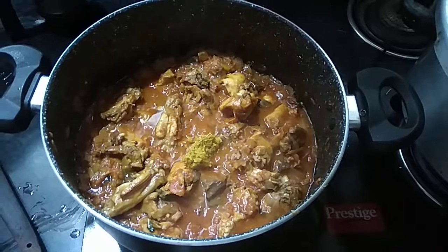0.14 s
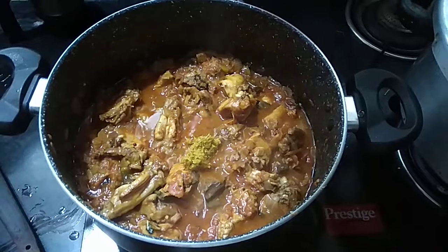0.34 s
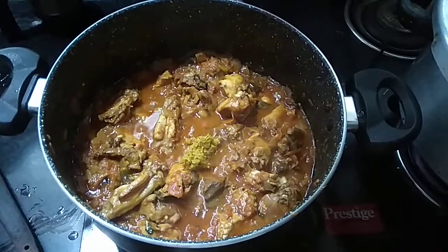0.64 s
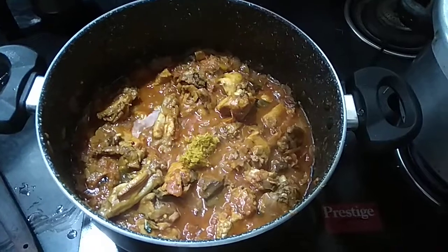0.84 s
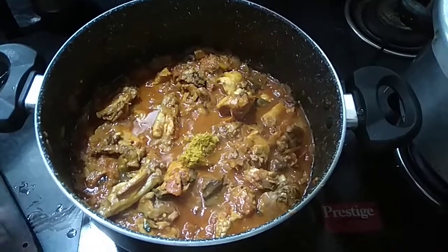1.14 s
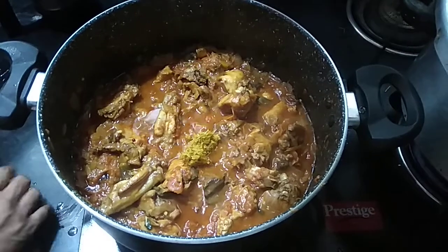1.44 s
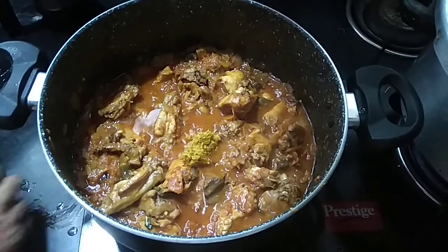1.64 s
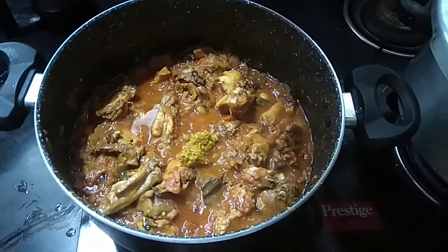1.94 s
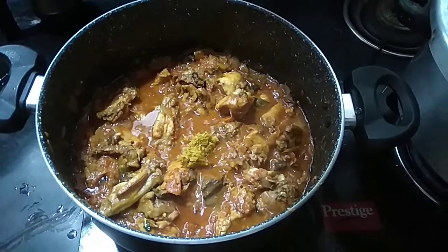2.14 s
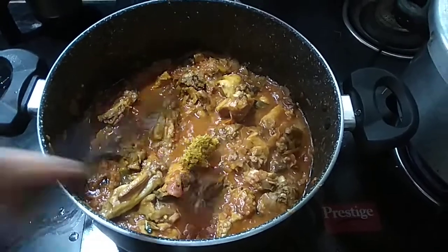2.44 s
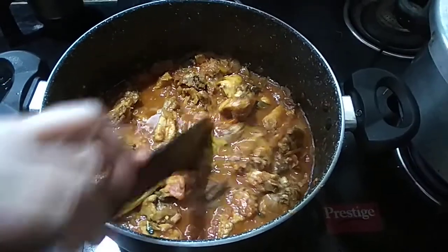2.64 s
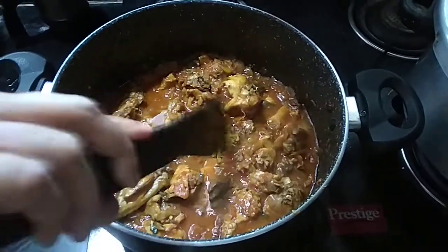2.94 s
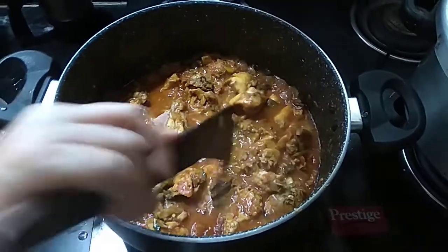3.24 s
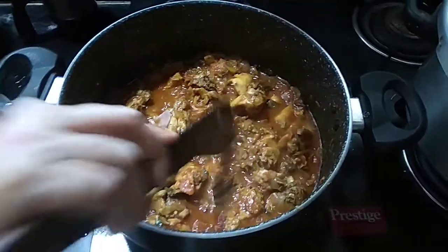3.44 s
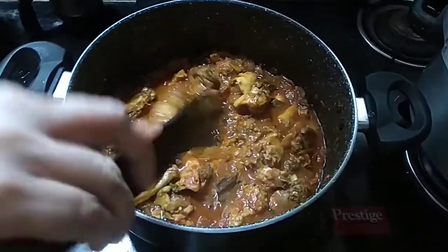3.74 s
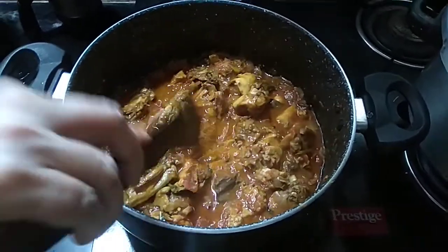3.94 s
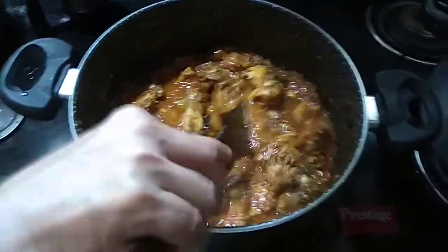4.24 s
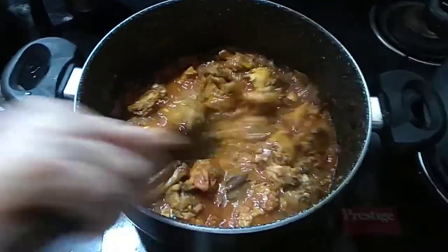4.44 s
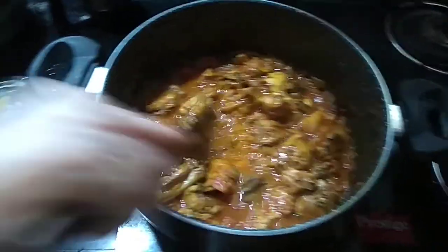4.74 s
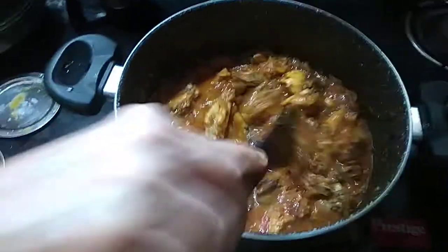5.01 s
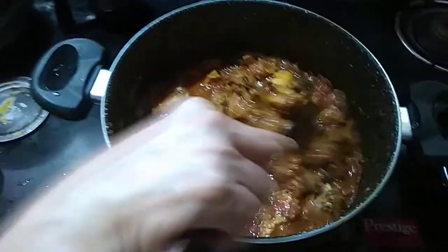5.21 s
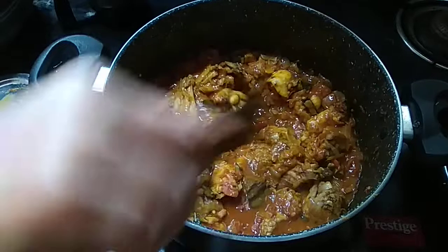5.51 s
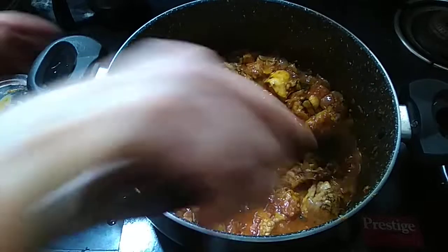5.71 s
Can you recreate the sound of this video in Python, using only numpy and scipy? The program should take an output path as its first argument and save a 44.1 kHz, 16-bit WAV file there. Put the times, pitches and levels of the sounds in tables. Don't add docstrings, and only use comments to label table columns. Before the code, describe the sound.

A thick curry sizzles without pause for about six seconds, a fine bright crackle with sharp spits of fat, close up in a small hard-walled kitchen. A dull knock opens, a brief low scrape follows at 0.5 s and a single thin bangle clink at 0.7. A brighter knock comes at 1.0, a lighter one at 1.4, and a heavy dull thud at 1.8 leaves a short low hum. Stirring starts near 2.7 with faint wet rubbing; bangles touch at 2.9, just before the heaviest knock at 3.0, and clink again at 3.3. A sharp spit pops at 3.6. From 4.2 to 4.65 the bangles jingle in a dense silvery cluster, ending with a firm knock. Damped clinks follow at 4.9, then ticks, squelches and a weaker knock around 5.2, and a hollow spatula scrape from 5.6 to 5.8. Low handling bumps shake the handheld stereo microphone, mainly left, strongest around 5.0.

```python
import sys
import numpy as np
from scipy import signal
from scipy.fft import rfft, irfft
from scipy.io import wavfile
from scipy.ndimage import uniform_filter1d, minimum_filter1d

SR = 44100
rng = np.random.default_rng(int(sys.argv[2]) if len(sys.argv) > 2 else 0)


def persist_wave(psi):
    counts = np.round(np.clip(psi, -1, 1) * 32767).astype(np.int16)
    wavfile.write(sys.argv[1], SR, np.atleast_2d(counts).T)


def linear_from_db(decibels):
    return 10 ** (np.asarray(decibels, float) / 20)


N = 258867


def in_time(rows):
    s, *columns = np.transpose(rows)
    return [np.interp(np.arange(N) / SR, s, c) for c in columns]


def rms_one(x):
    return x / np.sqrt(np.mean(x ** 2) + 1e-20)


def coloured(x, points):
    log_hz = np.log(np.fft.rfftfreq(x.shape[-1], 1 / SR) + 1)
    point_hz, point_db = np.transpose(points)
    return irfft(rfft(x) * linear_from_db(np.interp(log_hz, np.log(point_hz), point_db)), x.shape[-1])


def drift(rate_hz):
    knots = rng.standard_normal(int(N / SR * 60) + 3)
    return np.interp(np.arange(N) / SR * rate_hz, np.arange(len(knots)), knots)


def grains(per_s, spread_db):
    happens = rng.random(N) < per_s / SR
    height = linear_from_db(spread_db * np.minimum(rng.exponential(1, N), 5))
    return happens * height * rng.choice([-1, 1], N)


def ring(clicks, hz, t60):
    r, w = linear_from_db(-60 / (t60 * SR)), 2 * np.pi * hz / SR
    return signal.lfilter([0, np.sin(w)], [1, -2 * r * np.cos(w), r * r], clicks + 1e-18)


def resonance(x, hz, width_hz):
    r = np.exp(-np.pi * width_hz / SR)
    poles = [1, -2 * r * np.cos(2 * np.pi * hz / SR), r * r]
    return signal.lfilter((1 - r * r) / 2 * np.array([1, 0, -1]), poles, x)


def struck(hz, width_hz, contact_s):
    t = np.arange(4000) / SR
    rattle = rng.standard_normal(len(t)) * np.exp(-t / contact_s) * (1 - np.exp(-t / 0.00033))
    x = rattle + 9.55 * (t == 0)
    x = resonance(resonance(resonance(x, hz, width_hz), hz, 1.06 * width_hz), hz, 2 * width_hz)
    return x / np.abs(x).max()


def swells(rows, rise_db_s, fall_db_s):
    t, gains = np.arange(N) / SR, 0
    for s, hold, *db in rows:
        lost_db = rise_db_s * np.maximum(s - t, 0) + fall_db_s * np.maximum(t - s - hold, 0)
        gains = gains + linear_from_db(np.array(db)[:, None] - lost_db)
    return gains


def pan(x, db):
    return np.array([x * linear_from_db(db / 2), x * linear_from_db(-db / 2)])


def add(out, s, piece):
    i = max(round(s * SR), 0)
    out[:, i:i + piece.shape[1]] += piece[:, :N - i]


def room(x, wet_db, alike):
    # pitch_hz, t60_s
    room_t60 = [(200, 0.24), (600, 0.29), (2000, 0.4), (6000, 0.33), (12000, 0.029)]
    t60_hz, t60_s = np.transpose(room_t60)
    t = np.arange(int(.6 * SR)) / SR
    mid, side = 0, 0
    for hz in 62.5 * 2 ** np.arange(8):
        t60 = np.interp(np.log(hz), np.log(t60_hz), t60_s)
        top_hz = hz * np.sqrt(2) if hz < 7000 else 19000
        sos = signal.butter(2, [hz / np.sqrt(2), top_hz], "band", fs=SR, output="sos")
        fade = linear_from_db(-60 * t / t60) * (1 - np.exp(-t / 0.0034))
        band = signal.sosfilt(sos, rng.standard_normal((2, len(t)))) * fade
        mid = mid + band[0] * (1 if hz < 700 else 0.6)
        side = side + band[1] * (1 if hz < 700 else 1.5)
    tail = np.array([np.sqrt(1 + alike) * mid + sign * np.sqrt(1 - alike) * side for sign in (1, -1)])
    tail = tail / np.sqrt(np.sum(tail ** 2) / 2)
    return x + linear_from_db(wet_db) * signal.fftconvolve(x, tail, axes=1)[:, :N]


def air():
    # pitch_hz, level_db (per Hz)
    air_colour = [(13, -31.5), (22, 7.5), (97, -10.5), (149, -8), (495, -8), (701, -14.5), (1210, -6.5),
                  (1600, -16), (2480, -4), (3150, -25.5), (4000, -17), (5200, -32.5), (8800, -120)]
    noise = coloured(rng.standard_normal((2, N)), air_colour + [(9000, -64.0)])
    return linear_from_db(-75.5) * rms_one(noise)


def sizzle():
    # time_s, level_db, left_right_db
    frying = [(0.0, -51, 1.5), (0.62, -48.5, 2), (0.85, -52, 0.5), (1.27, -50, 3), (1.52, -51.5, 1.5),
              (1.93, -51, 1), (2.78, -52, 3), (3.86, -51.5, 1.5), (4.33, -50.5, 3.5), (4.56, -50.5, -7.5),
              (4.67, -49, 1.5), (4.87, -53.5, 6), (5.28, -51, 3), (5.48, -52, 1), (5.71, -52, 4),
              (5.87, -48.5, 4.5)]
    # pitch_hz, level_db (per Hz)
    frying_colour = [(1470, -46.5), (2500, -11), (3110, -7.5), (3640, -7), (5030, 2), (6260, 4), (7040, 3),
                     (9490, 8.5), (15600, 3), (16000, -41.5), (16300, -57)]
    level_db, pan_db = in_time(frying)
    bursts_per_s = 3500 * linear_from_db(2.5 * drift(55))
    voices = []
    for _ in range(2):
        clicks, dealt = grains(bursts_per_s, 3.42), rng.integers(0, 10, N)
        pips = 0
        for k, hz in enumerate(np.geomspace(3500, 15500, 10)):
            pips = pips + ring(clicks * (dealt == k), hz, 15.0 / hz) * hz ** 0.69
        voices.append(rms_one(pips) + 0.6 * rng.standard_normal(N))
    both = np.array(voices) + 0.022 * np.array(voices[::-1])
    return rms_one(coloured(both, frying_colour)) * pan(linear_from_db(level_db + 1.5 + drift(26)), pan_db)


def rumble():
    # start_s, hold_s, level_db
    jolts = [(0.001, 0.0073, -69.5), (0.52, 0.008, -90), (1.06, 0.027, -90), (1.45, 0.0082, -77),
             (1.67, 0.01, -103), (1.87, 0.083, -70), (2.03, 0.014, -72), (2.65, 0.006, -79.5),
             (2.86, 0.01, -85.5), (3.08, 0.085, -69), (3.3, 0.28, -90), (3.6, 0.0066, -89.5),
             (4.29, 0.0051, -72), (4.66, 0.091, -67), (5.04, 0.068, -56), (5.2, 0.12, -62),
             (5.74, 0.028, -76), (5.85, 0.022, -67)]
    still_grip_db = -94.5
    shake = rng.standard_normal((2, N))
    level = swells(jolts, rise_db_s=344.5, fall_db_s=242)[0] + linear_from_db(still_grip_db)
    thud = rms_one(resonance(resonance(shake[0], 84, 23), 95.0, 86))
    sway = rms_one(resonance(resonance(shake[1], 44, 130), 32, 74))
    return pan(level * thud, 17) + pan(0.17 * level * sway, 46.0)


def knocks():
    # start_s, peak_db, body_hz, body_width_share (of body_hz), hardness_db
    blows = [
        (0.003, -38.5, 390, 1, -15.5),
        (1.043, -29.5, 890, 0.43, -13),
        (1.42, -33.5, 596, 0.27, -13),
        (1.642, -53, 504, 0.17, 5.5),
        (1.842, -27, 479, 0.49, -38.5),
        (3.034, -21, 521, 0.43, -33),
        (4.645, -27, 502, 0.58, -20),
        (5.237, -36, 547, 0.48, -26.5),
    ]
    # start_s, peak_db, pitch_hz, width_hz
    overtones = [(0.002, -37.5, 1180, 610), (0.002, -52.5, 257, 108), (1.030, -46, 760, 294),
                 (1.039, -35.5, 3750, 2380), (1.044, -51, 477, 206), (1.422, -44, 4950, 300),
                 (1.417, -42.5, 6900, 600), (1.416, -36, 9600, 900), (1.041, -24, 12600, 4060),
                 (1.426, -48, 2000, 280), (1.846, -35.5, 290, 130), (1.842, -33, 550, 220),
                 (1.845, -45, 216, 90), (1.848, -37.5, 1100, 694), (1.848, -36, 4300, 1510),
                 (1.849, -22, 8500, 8070), (1.849, -30, 2400, 1000), (3.04, -30, 1000, 450),
                 (3.034, -40, 288, 110.3), (3.041, -40.5, 1590, 880), (4.601, -56.5, 1710, 396),
                 (4.647, -38.5, 978, 200), (4.646, -36.5, 288, 152), (4.651, -43, 1250, 372),
                 (5.222, -47.5, 705, 385)]
    crack_over_ring_db = 21.5
    out = np.zeros((2, N))
    for s, db, hz, width_share, ring_db in blows:
        body = struck(hz, width_share * hz, 0.0086)
        bright_ring = linear_from_db(ring_db) * struck(2420, 1409, 0.0065)
        crack = linear_from_db(ring_db + crack_over_ring_db) * struck(5400, 11000, 0.0056)
        add(out, s, pan(linear_from_db(db - 5.5) * (body + bright_ring + crack), 8.2))
    for s, db, hz, width_hz in overtones:
        add(out, s, pan(linear_from_db(db) * struck(hz, width_hz, 0.0074), 5.7))
    return out


def ticks():
    # start_s, peak_db, pitch_hz, width_hz
    specks = [(0.0473, -32, 9200, 6030), (0.616, -33, 8000, 6000), (1.2316, -45, 9100, 6000),
              (1.2595, -38, 9100, 6000), (1.7464, -55, 9000, 6000), (2.2992, -51, 9000, 6000),
              (2.396, -30, 9050, 5960), (3.1694, -37, 9000, 9000), (3.8227, -32, 9000, 6000),
              (4.0741, -36.5, 9450, 6050), (4.3176, -36.5, 12200, 6000), (4.369, -36, 12700, 4000),
              (4.8903, -37, 3970, 5070), (5.0619, -36, 9000, 6000), (5.145, -35, 9000, 6000),
              (5.1934, -34, 9000, 6000), (5.1308, -56, 5600, 2500), (5.1462, -33, 5070, 2500),
              (5.175, -58, 4000, 1500), (5.2011, -28.5, 3520, 2500), (5.2201, -37, 4270, 2500),
              (5.228, -34, 4800, 3000), (5.515, -40, 6080, 2420), (5.7917, -43, 9000, 6000),
              (4.3875, -30, 10500, 6000), (4.7175, -34, 10500, 6000)]
    out = np.zeros((2, N))
    for s, db, hz, width_hz in specks:
        add(out, s, pan(linear_from_db(db) * struck(hz, width_hz, 0.0012), 3.0))
    return out


def touches():
    # start_s, peak_db, pitch_hz
    plops = [(0.168, -59.5, 355), (0.207, -63, 1250), (1.678, -81, 503), (1.828, -58, 497),
             (2.149, -61, 475), (2.207, -62, 1210), (2.349, -66, 636), (2.524, -65.5, 355),
             (2.588, -71, 1010), (2.629, -57, 538), (2.739, -62, 1910), (2.778, -60, 1980),
             (2.922, -54, 1647), (3.419, -57, 1456), (3.601, -68, 1890), (3.865, -61.5, 1963),
             (4.342, -57, 1152), (5.069, -57.5, 420), (5.197, -56.5, 1150), (5.223, -48, 282)]
    # start_s, peak_db, pitch_hz, width_hz
    squelches = [(0.251, -65.5, 1238, 117), (2.74, -71, 344, 120), (2.929, -62, 568, 195),
                 (3.421, -48.5, 2630, 1240), (3.649, -66.5, 1890, 122), (4.169, -71.5, 426, 300),
                 (4.241, -62, 1050, 496), (4.317, -63, 490, 200), (4.901, -44.5, 3360, 2530),
                 (5.074, -64, 1310, 152), (5.072, -60, 1690, 194), (5.2, -50, 2200, 706),
                 (5.793, -64, 2990, 616)]
    # start_s, peak_db, pitch_hz, width_hz
    catches = [(0.466, -57, 380, 129), (0.488, -44, 355, 88), (0.498, -52.5, 1186, 199),
               (0.529, -51, 450, 129), (0.591, -66, 1186, 150), (5.635, -48.5, 567, 127),
               (5.643, -52.5, 2000, 1090), (5.660, -60, 2000, 153), (5.711, -61, 1030, 198),
               (5.732, -70, 344, 90), (5.766, -46.5, 341, 60), (5.761, -48.5, 1170, 249),
               (5.805, -42, 590, 132), (5.806, -54, 2250, 150), (5.809, -47, 1250, 300)]
    plop_width_hz = 143
    out = np.zeros((2, N))
    for s, db, hz, width_hz in [(*row, plop_width_hz) for row in plops] + squelches + catches:
        add(out, s, pan(linear_from_db(db) * struck(hz, width_hz, 0.013), 14))
    return out


def spits():
    # start_s, peak_db, left_right_db
    fat_bursts = [(0.243, -32, -6), (0.4775, -40, 19), (1.1872, -45, 3), (1.492, -28, 4),
                  (1.6189, -32.5, 2), (1.729, -34, -8), (1.8127, -35.5, -7), (2.398, -30.5, 3),
                  (2.698, -34, -10), (3.167, -43, -12), (3.236, -56, 2), (3.5795, -23, 4.5),
                  (3.8233, -34.5, -4), (3.871, -36, 8.5), (3.9535, -29.5, 6.5), (4.3198, -54, -15),
                  (4.3884, -25.5, 8), (5.0619, -37, 22.5), (5.1178, -36, -16), (5.1476, -34, 14),
                  (5.1919, -33, 2), (5.396, -49, -18), (5.7073, -33, -2), (5.8426, -42, 23)]
    mean_hz, spread_oct, spray_share = 10800, 0.15, 1.6
    out, t = np.zeros((2, N)), np.arange(2000) / SR
    for s, db, pan_db in fat_bursts:
        hz = mean_hz * 2 ** (spread_oct * rng.uniform(-0.35, 1))
        pip = np.exp(-t / 0.0002)
        spray = (rng.random(len(t)) < 1500 / SR) * np.exp(-t / 0.028)
        burst = rng.standard_normal(len(t)) * (pip + spray_share * spray)
        burst = resonance(resonance(burst, hz, 2800), hz, 5400)
        add(out, s, pan(linear_from_db(db - 2.0) * burst / np.abs(burst).max(), np.clip(pan_db, -12, 14)))
    return out


def drags():
    # start_s, hold_s, low_modes_db, high_modes_db
    strokes = [
        [(0.476, 0.057, -57.5, -68), (0.505, 0.06, -71, -65)],
        [(5.64, 0.041, -49.5, -57.5), (5.73, 0.037, -57, -62.5), (5.775, 0.07, -47.5, -53.5)],
    ]
    # pitch_hz, width_hz, level_db
    floor_modes = [
        [(355, 92, 0), (1186, 75, -11.5), (1480, 100, -20.5), (2000, 34, -26), (2420, 500, -25),
         (2840, 160, -19.5)],
        [(344, 39, 9.5), (593, 71, 1.5), (971, 20, -1.5), (1170, 210, -10.5), (1670, 9.5, -11), (2000, 90, -31),
         (2250, 90, -20), (2944, 210, -21)],
    ]
    out, slips = 0, grains(2500, 2.5)
    for rows, modes in zip(strokes, floor_modes):
        levels = swells(rows, rise_db_s=2500, fall_db_s=400)
        for level, is_low in zip(levels, (True, False)):
            body = 0
            for hz, width_hz, db in modes:
                if (hz < 850) == is_low:
                    body = body + linear_from_db(db) * resonance(resonance(slips, hz, width_hz), hz, 1.5 * width_hz)
            out = out + level * rms_one(body)
    return pan(out, 5.4)


def clash(strikes, modes, ring_share):
    out, t = np.zeros((2, N)), np.arange(7500) / SR
    hz, level_db, t60 = np.transpose(modes)[:, :, None]
    next_touches = [row[0] for row in strikes[1:]] + [N / SR]
    for (s, db, top_hz, pan_db, attack_ms), later in zip(strikes, next_touches):
        strength_db = level_db + rng.normal(0, 4, hz.shape) - 8 * abs(np.log2(hz / top_hz))
        strength_db = strength_db + 4.5 * (abs(hz / top_hz - 1) < .02)
        flutter_db = 0.14 * signal.lfilter([1], [1, -.985], rng.standard_normal((len(modes), len(t))))
        decay = linear_from_db(strength_db + flutter_db - 60 * t / (ring_share * t60))
        rings = decay * np.sin(2 * np.pi * (hz * t + rng.random(hz.shape)))
        rubbing = resonance(resonance(rng.standard_normal(len(t)), 14000, 5000), 11500, 7000)
        rattle = rubbing * linear_from_db(-4 - 60 * t / (0.18 * ring_share))
        attack = (1 - np.exp(-1500 * t / attack_ms)) ** 2
        piece = (rings.sum(axis=0) + rattle) * attack * (0.45 + np.exp(-t / 0.015))
        damped = linear_from_db(-9 * np.clip((t - (later - s) + .010) / .012, 0, 1))
        add(out, s, pan(linear_from_db(db) * damped * piece / np.abs(piece).max(), np.clip(pan_db, -16, 16)))
    return out


def bangles():
    # start_s, peak_db, loudest_hz, left_right_db, attack_ms
    clinks = [
        (0.7367, -26, 12500, -1, 0.28),
        (2.9106, -30.5, 12050, 18.5, 0.41),
        (2.9225, -29, 11080, -12.5, 1.9),
        (3.3032, -29, 10760, -9, 0.84),
        (3.3185, -38.5, 11000, -14, 1.5),
    ]
    jingles = [(4.2243, -42.5, 10760, 8, 1.4), (4.252, -34.5, 12000, 9.5, 3.1), (4.358, -35, 11400, 0, 1.1),
               (4.4058, -21.5, 13500, 13, 4.2), (4.452, -21.5, 10300, 16, 5),
               (4.4615, -20.5, 10820, 13, 6.8), (4.476, -25, 10300, 13.5, 3),
               (4.508, -17.5, 10830, 14, 5.5), (4.546, -27, 13500, 10, 2.5),
               (4.5695, -15.5, 13500, 12, 0.8), (4.5905, -16.5, 12005, 11, 6), (4.631, -27, 12100, 10, 2.2),
               (4.646, -30, 12005, 8, 4)]
    damp_jingles = [
        (4.8891, -29, 11500, -4, 2.5),
        (4.9, -29.5, 14900, 8.5, 4),
        (4.921, -30, 10070, -10.5, 0.94),
        (4.9531, -30, 12100, 2, 0.8),
    ]
    # pitch_hz, level_db, t60_s
    thin_bangle = [(9900, -14, .08), (10560, -10, .08), (10985, -6, .1), (11080, 0, .11), (11200, -2, .1),
                   (11500, -9, .08), (11720, -6, .12), (11900, -9, .08), (12250, -6, .08),
                   (13100, -12, .06), (15570, -16, .08)]
    large_bangles = [(3950, -20, .25), (5250, -22, .1), (5950, -16, .3), (7200, -20, .1), (8222, -11, .25),
                     (8900, -14, .08), (9232, -12, .1), (9458, -11, .15), (9880, -8, .1), (10020, -11, .1),
                     (10180, -6, .2), (10320, -9, .15), (10453, -2, .25), (10809, -5, .15)]
    small_bangles = [(10844, -1, .2), (10930, -7, .1), (11140, -8, .1), (11390, -10, .1), (12005, -3, .2),
                     (12136, -7, .12), (12188, -8, .2), (12410, -11, .1), (13005, -10, .12),
                     (13310, -7, .12), (13424, -4, .1), (13600, -5, .15), (14000, -12, .1),
                     (14750, -7, .25)]
    bunch = large_bangles + small_bangles
    out = clash(clinks, thin_bangle, ring_share=0.55)
    out = out + clash(jingles, bunch, ring_share=0.91)
    return out + clash(damp_jingles, bunch, ring_share=0.52)


def slides():
    # start_s, peak_db, pitch_hz, width_hz, contact_s
    contacts = [(4.465, -58, 2330, 250, 0.04), (4.475, -58, 2800, 400, 0.03), (4.51, -60, 2350, 200, 0.03),
                (4.59, -44, 5250, 300, 0.006), (4.6, -58, 3050, 400, 0.04), (1.8425, -30, 480, 260, 0.004),
                (1.853, -28, 400, 300, 0.005), (3.052, -25, 620, 400, 0.003), (3.09, -40, 600, 400, 0.012),
                (3.17, -46, 800, 700, 0.03), (5.672, -46, 600, 150, 0.006), (5.826, -42, 480, 300, 0.01),
                (5.0095, -39, 8500, 4000, 0.0006), (5.038, -37, 9000, 4000, 0.0006),
                (5.082, -36, 9500, 4000, 0.001), (5.146, -35, 13500, 5000, 0.006),
                (5.119, -42, 11500, 2000, 0.012), (5.2, -38, 14000, 4000, 0.001),
                (1.045, -50, 2000, 250, 0.025), (1.042, -42, 4200, 600, 0.004),
                (1.046, -30, 6500, 6000, 0.0006), (4.65, -38, 1000, 300, 0.02),
                (1.95, -44, 300, 250, 0.015)]
    # start_s, peak_db, pitch_hz, width_hz, contact_s
    singing = [(4.405, -30, 13600, 300, 0.004), (4.405, -40, 8222, 100, 0.02),
               (4.455, -43, 5950, 60, 0.025), (4.468, -31, 13500, 200, 0.015),
               (4.478, -41, 8222, 80, 0.015), (4.592, -21, 12005, 250, 0.003),
               (4.595, -33, 14750, 80, 0.025), (4.644, -31, 12005, 90, 0.012),
               (4.655, -41, 13600, 80, 0.02), (2.923, -36, 15000, 1500, 0.002),
               (2.925, -31, 11080, 400, 0.003)]
    out = np.zeros((2, N))
    for s, db, hz, width_hz, contact_s in contacts + singing:
        add(out, s, pan(linear_from_db(db) * struck(hz, width_hz, contact_s), 6.0))
    return out


def bumps():
    # start_s, peak_db, width_hz
    pushes = [
        (1.866, -56, 11),
        (4.967, -49, 14),
        (5.0505, -33, 90),
    ]
    out, push = np.zeros((2, N)), signal.unit_impulse(SR // 2)
    for s, db, width_hz in pushes:
        shudder = resonance(resonance(resonance(push, 61, 100), 85, width_hz), 60, 53)
        add(out, s, pan(linear_from_db(db) * shudder / np.abs(shudder).max(), 12.0))
    return out


def hum():
    # start_s, hold_s, level_db
    worktop = [
        (1.885, 0.055, -48.5),
        (1.955, 0.02, -54),
        (2.025, 0.045, -56.5),
        (3.08, 0.08, -72),
    ]
    level = swells(worktop, rise_db_s=500, fall_db_s=700)[0]
    tone = np.sqrt(2) * np.sin(2 * np.pi * 85 * np.arange(N) / SR)
    return pan(level * tone, 12.0)


def stirring():
    # start_s, hold_s, murmur_db, rub_db
    strokes = [(2.72, 0.017, -70, -61.5), (2.93, 0.028, -76, -67.5), (3.62, 0.014, -65.5, -58),
               (3.87, 0.018, -79, -80), (4.12, 0.16, -69, -60.5), (4.42, 0.13, -71, -61.5),
               (4.6, 0.13, -98, -60), (5.08, 0.0076, -90, -63), (5.2, 0.16, -84, -62)]
    # pitch_hz, width_hz, level_db
    sauce_modes = [(1250, 34, -0.5), (1890, 100, 12), (2351, 180, 1), (2530, 62, 2), (4300, 250, -4),
                   (4750, 150, 4)]
    murmur_level, rub_level = swells(strokes, rise_db_s=248, fall_db_s=124)
    murmur = 0
    for hz, width_hz, db in sauce_modes:
        flicker = linear_from_db(db + 3 * drift(21))
        mode = resonance(resonance(rng.standard_normal(N), hz, width_hz), hz, 2 * width_hz)
        murmur = murmur + flicker * mode
    rub = resonance(resonance(rng.standard_normal((2, N)), 3300, 1700), 4200, 2400)
    return pan(murmur_level * rms_one(murmur), 9.7) + linear_from_db(3.5) * rub_level * rms_one(rub)


def starve(x):
    # pitch_hz, level_db
    threshold = [(1000, -20), (1500, -2), (2500, 5), (3600, 7), (4800, 4), (6000, -1), (8000, -10),
                 (10500, -7), (12000, -1), (14000, 2), (15500, 4)]
    wander_db, masking = 4, 0.3
    frame = dict(window=np.sqrt(signal.get_window("hann", 2048)), nperseg=2048, noverlap=1024)
    hz, _, lines = signal.stft(np.pad(x, ((0, 0), (254, 0))), SR, **frame)
    level_db = 10 * np.log10(np.mean(np.abs(lines) ** 2, axis=0) + 1e-20)
    usual_db = minimum_filter1d(uniform_filter1d(level_db, size=25, axis=0), size=3, axis=1)
    usual_db = np.minimum(usual_db, np.median(usual_db, axis=1)[:, None] + 4)
    treble_db = 10 * np.log10(np.mean(linear_from_db(2 * level_db[hz > 8000]), axis=0))
    usual_db = usual_db + masking * np.maximum(treble_db - np.median(treble_db) - 4, 0)
    point_hz, point_db = np.transpose(threshold)
    margin_db = np.interp(np.log(hz + 1), np.log(point_hz), point_db, left=-99)
    jumps = rng.standard_normal((200, level_db.shape[1]))
    band = (9 * np.sqrt(np.arange(len(hz)))).astype(int) // 3
    jumps = (jumps + np.roll(jumps, 1, axis=1))[band]
    kept = level_db > usual_db + margin_db[:, None] + wander_db * jumps
    return signal.istft(lines * kept, SR, **frame)[1][:, 254:N + 254]


def scene():
    far = room(knocks(), wet_db=3.5, alike=0.49)
    wet = touches()
    touch_room_share = 0.68
    close = bangles() + spits() + drags() + touch_room_share * wet
    near = (1 - touch_room_share) * wet + room(close, wet_db=-5, alike=0.052)
    direct = sizzle() + stirring() + rumble() + bumps() + air() + ticks() + hum() + slides()
    return far + near + direct


def low_pass(x):
    return signal.sosfilt(signal.butter(12, 16460, fs=SR, output="sos"), x)


def record(dry):
    late = np.array([np.roll(dry[0], 5), dry[1]])
    late = signal.sosfilt(signal.cheby2(10, 50, 16500, fs=SR, output="sos"), late)
    mix = starve(late)
    return low_pass(mix)


dry = scene()
out = record(dry)
persist_wave(out)
```